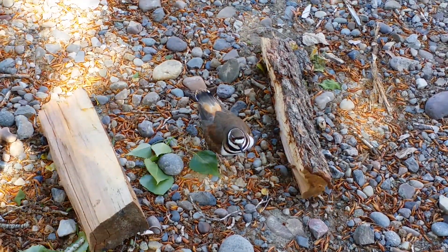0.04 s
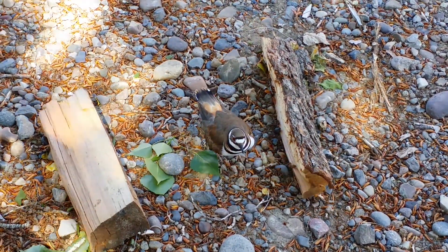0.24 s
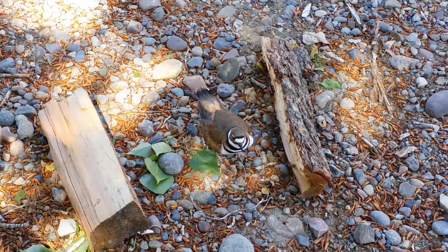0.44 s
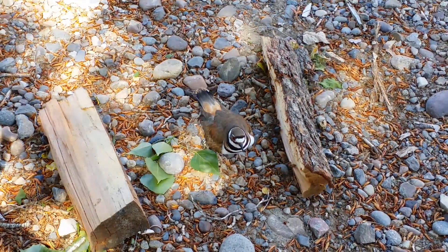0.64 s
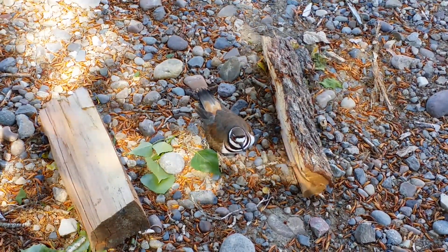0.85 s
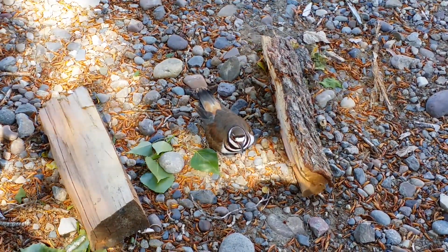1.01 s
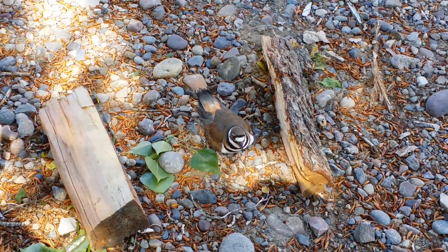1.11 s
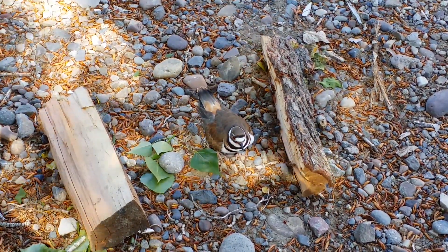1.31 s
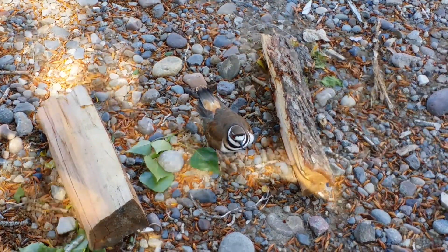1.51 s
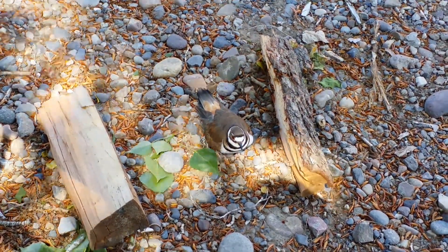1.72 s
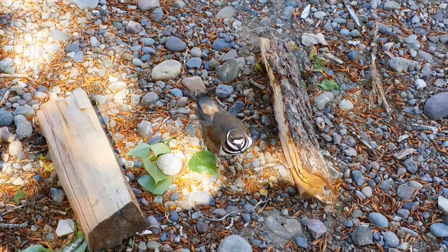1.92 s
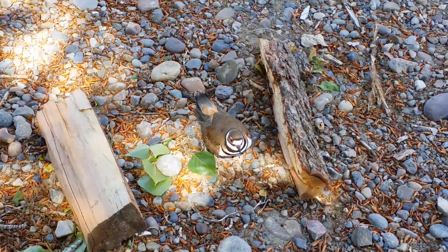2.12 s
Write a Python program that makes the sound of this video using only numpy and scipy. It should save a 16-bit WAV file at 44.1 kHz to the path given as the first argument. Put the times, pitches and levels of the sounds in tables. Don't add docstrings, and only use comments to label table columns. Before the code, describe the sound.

Three evenly spaced, sharp high bird calls, each popping open roughly then breaking to a smoother lower note, close at right on a hand-held stereo microphone; quiet open-air rumble, wind buffets and a faint far hoot.

```python
import sys
import numpy as np
from scipy import signal
from scipy.fft import rfft, irfft, next_fast_len
from scipy.io import wavfile
from scipy.ndimage import uniform_filter1d, map_coordinates

SR = 44100
rng = np.random.default_rng(int(sys.argv[2]) if len(sys.argv) > 2 else 0)


def ratio(d):
    e = np.asarray(d, float) / 20
    return 10 ** e


def dump_mix(stems):
    frames = np.atleast_2d(stems).T
    limited = np.clip(frames, -1, 1)
    pcm = np.round(limited * 32767).astype(np.int16)
    wavfile.write(sys.argv[1], SR, pcm)


N = 94815

# time in seconds, pitch in Hz, level in dB, left minus right in dB.
FIRST_CALL = [
    (.224, 4790, -23, 1),
    (.234, 4927, -13, -11),
    (.247, 4813, -14.5, -11),
    (.254, 4770, -29.5, 3),
    (.261, 4380, -12, -21),
    (.274, 4283, -17.5, -27),
    (.346, 4462, -10, -39),
    (.357, 4596, -20, -15),
    (.366, 4505, -19, -14),
]
SECOND_CALL = [
    (.978, 4760, -24.5, -13),
    (.99, 4920, -14, -8),
    (1.001, 4790, -21.5, -7),
    (1.007, 4700, -25.5, -21),
    (1.013, 4600, -18, -19),
    (1.02, 4446, -13.5, -16),
    (1.043, 4406, -13.5, -37),
    (1.062, 4300, -13, -33),
    (1.087, 4362, -12, -12),
]
THIRD_CALL = [
    (1.77, 4820, -21, -12),
    (1.785, 4900, -14, -10),
    (1.798, 4680, -24.5, -32),
    (1.804, 4564, -13.5, -16),
    (1.817, 4394, -13.5, -20),
    (1.84, 4393, -13, -17),
    (1.86, 4278, -13.5, -21),
    (1.881, 4363, -13, -10),
]


def unit(x):
    return x / np.sqrt(np.mean(x ** 2) + 1e-20)


def along(points, hz):
    f, v = np.transpose(points)
    return np.interp(np.log(hz + 1), np.log(f + 1), v)


def curves(rows):
    s, *cols = np.transpose(rows)
    t = np.arange(N) / SR
    return [uniform_filter1d(np.interp(t, s, c), size=151) for c in cols]


def gate(rows):
    open_s, release_s = .0012, .012
    t = np.arange(N) / SR
    opening = np.clip((t - rows[0][0]) / open_s, 0, 1)
    closing = np.clip(1 - (t - rows[-1][0]) / release_s, 0, 1) ** 2.2
    return opening * closing


def wobble(rate):
    knots = rng.standard_normal(int(N * rate / SR) + 4)
    return map_coordinates(knots, [np.arange(N) * rate / SR])


def filtered(x, response):
    m = next_fast_len(N + 8192)
    return irfft(rfft(x, m) * response(np.fft.rfftfreq(m, 1 / SR)), m)[..., :N]


def rush(spectrum, patchy_db):
    # frequency in Hz, left-right likeness from 0 to 1.
    alike = [(60, 0.62), (250, 0.91), (640, 0.8), (1400, 0.13), (3000, 0.04), (8000, .05)]
    # frequency in Hz, left minus right in dB.
    lean = [(60, -6), (200, -2.5), (640, -3), (1400, 2.5), (4000, -0.5), (8000, -7.5), (10200, -8),
            (11000, -39)]
    left_lead_s = .00014

    z = signal.stft(rng.standard_normal((2, N)), nperseg=512)[2]
    patches = uniform_filter1d(rng.standard_normal(z.shape[1:]), size=6, axis=0)
    patches = uniform_filter1d(patches, size=14, axis=1)
    pair = signal.istft(z * ratio(patchy_db * unit(patches)), nperseg=512)[1][:, :N]

    def shared_and_different(hz):
        turn = np.arccos(np.clip(along(alike, hz), -1, 1)) / 2
        return ratio(along(spectrum, hz)) * [np.cos(turn), np.sin(turn)]

    def leaning(hz):
        gain = ratio(np.minimum(0, np.outer([1, -1], along(lean, hz))))
        return gain * np.exp(np.outer([1j, -1j], np.pi * hz * left_lead_s))

    mid, side = filtered(pair, shared_and_different)
    return unit(filtered(np.array([mid + side, mid - side]), leaning))


def air():
    # time in seconds, background level in dB.
    swell = [
        (0.0, -44),
        (0.02, -41.5),
        (0.2, -42.5),
        (0.22, -47.5),
        (1.09, -48.5),
        (1.41, -45.5),
        (1.75, -46),
        (1.77, -48),
        (2.04, -47),
        (2.15, -48.5),
    ]
    # frequency in Hz, strength in dB per Hz.
    rumble_spectrum = [(21, -20), (35, -22), (70, 0), (183, -3.5), (430, -8.5), (941, -9.5), (1190, -9),
                       (1780, -3.5), (2700, -16), (3510, -19.5), (5940, -120)]
    hiss_spectrum = [(1500, -34), (2500, -11.5), (4700, 0.54), (6100, -8), (8100, -4), (10500, -10.5),
                     (14400, -14.5), (15000, -58)]

    level_db, = curves(swell)
    rumble = ratio(5 + 0.23 * wobble(7.33)) * rush(rumble_spectrum, patchy_db=0.74)
    hiss = ratio(2.5 + 0.17 * wobble(5.7)) * rush(hiss_spectrum, patchy_db=1.2)
    return ratio(level_db) * (rumble + hiss)


def gusts():
    # middle of the gust in seconds, length in seconds, level in dB.
    puffs = [(0.08, 0.097, -60), (0.15, 0.045, -29), (0.183, .025, -41), (0.28, 0.055, -34.5),
             (0.621, 0.028, -36.5), (0.672, 0.046, -36.5), (0.873, 0.05, -39.5), (0.913, .03, -41),
             (1.303, 0.0067, -32.5), (1.912, 0.023, -38), (2.009, 0.091, -31), (2.108, .025, -29),
             (2.14, 0.015, -32.5)]
    # frequency in Hz, strength in dB per Hz.
    buffet_spectrum = [(25, -45), (50, -10), (85, 0.7), (140, -11.5), (260, -25.5), (500, -52.5)]
    left_db = -21

    t = np.arange(N) / SR
    swell = sum(ratio(db) * np.exp(-((t - s) / (0.42 * length)) ** 2) for s, length, db in puffs)
    noise = unit(filtered(rng.standard_normal((2, N)), lambda hz: ratio(along(buffet_spectrum, hz))))
    return ratio([[left_db], [0]]) * swell * noise


def breath_noise():
    # frequency in Hz, strength in dB per Hz.
    breath_spectrum = [(4500, -60), (5200, -2), (9500, 0), (12000, -6), (15000, -9)]
    noise = filtered(rng.standard_normal((2, N)), lambda hz: ratio(along(breath_spectrum, hz)))
    return ratio([[-18], [0]]) * noise


def call(rows):
    # multiple of the whistle, dB in the head, dB in the body, dB per 100 Hz of body pitch.
    partials = [
        (.5, -23, -37.5, 4),
        (1.5, -20.5, -44, 9.5),
        (2, -9, -8.5, -6),
        (2.5, -17.5, -36.5, 3),
        (3, -25.5, -36, 2),
    ]
    # multiple of the whistle, level in dB.
    doubled = [
        (1.25, -26),
        (1.75, -21),
        (2.25, -24),
        (2.75, -40),
    ]
    # frequency in Hz, left minus right in dB.
    shadow = [(2200, -4), (6200, -4), (7300, -12), (8700, -22), (10000, -15), (13500, -17)]
    body_hz, head_hz = 4300, 4634
    doubling_hz, doubling_span_hz = 4672, 108
    break_hz, break_span_hz = 4603, 130.5
    chirp_hz, chirp_s = 700, .0013
    pop_db, pop_s = 6, .0012
    waver_hz, break_jitter_hz = 5, 110
    shimmer_db, break_shimmer_db = .15, 1.8
    breath_db, click_db, right_db = -30, -29, 5
    left_late_s = .001066

    hz, level_db, pan_db = curves(rows)
    since = np.maximum(np.arange(N) / SR - rows[0][0], 0)

    head = np.maximum(np.clip((hz - head_hz) / 150 + .5, 0, 1) * (since < .06), since < .01)
    doubling = np.clip((hz - doubling_hz) / doubling_span_hz, 0, 1) * np.clip(since / 0.0088, 0, 1)
    broken = np.exp(-((hz - break_hz) / break_span_hz) ** 2) * (since < .06)

    chirp = chirp_hz * np.exp(-since / chirp_s)
    hz = hz - chirp + (waver_hz + break_jitter_hz * broken) * wobble(400)
    phase = 2 * np.pi * np.cumsum(hz) / SR

    def rough(k):
        return k * (shimmer_db + break_shimmer_db * broken) * wobble(300)

    def sides(left_db):
        return ratio(np.array([left_db, 0 * left_db]))

    voice = sides(pan_db) * ratio(rough(0.86)) * np.sin(phase)
    weak_db = 0.82 * np.minimum(level_db + 20.5, 0)
    for k, head_db, bottom_db, slope_db in partials:
        low_db = bottom_db + slope_db * np.clip(hz - body_hz, 0, 130) / 100
        db = head * head_db + (1 - head) * low_db
        gain = ratio(db + weak_db + rough(k) + 0.9 * k * wobble(50))
        voice += sides(along(shadow, k * hz)) * gain * np.sin(k * phase)
    for k, db in doubled:
        gain = ratio(db + 1.5 * wobble(150)) * doubling
        voice += sides(along(shadow, k * hz)) * gain * np.sin(k * phase)

    breath = ratio(breath_db) * (.02 + head + 2.2 * broken) * breath_noise()
    click = ratio(click_db - 60 * since / 0.0089) * (since > 0) * breath_noise()
    burst_db = pop_db * np.exp(-((since - pop_s) / pop_s) ** 2) * [[0], [1]]
    sung = np.sqrt(2) * ratio(level_db + burst_db) * gate(rows) * (voice + breath)
    both = ratio(right_db) * (sung + click)
    return filtered(both, lambda f: np.exp(-2j * np.pi * np.outer([left_late_s, 0], f)))


def echoes(x):
    near_db, near_t60_s = [-25, -28], .09
    tail_db, tail_t60_s = [-31, -27], .47
    t = np.arange(SR // 2) / SR
    near = rng.standard_normal((2, len(t))) * ratio(-60 * t / near_t60_s) * (t > .002)
    tail = rng.standard_normal((2, len(t))) * ratio(-60 * t / tail_t60_s) * (t > .01)

    def scaled(h, db):
        return ratio(db)[:, None] * h / np.linalg.norm(h, axis=1, keepdims=True)

    return signal.fftconvolve(x[None], scaled(near, near_db) + scaled(tail, tail_db), axes=1)[:, :N]


def bird():
    # frequency in Hz, echo strength in dB.
    echo_colour = [(2000, 2), (5000, 0), (9000, -5), (14000, -16)]
    total = np.zeros((2, N))
    for rows in (FIRST_CALL, SECOND_CALL, THIRD_CALL):
        direct = call(rows)
        dull = filtered(direct[1], lambda hz: ratio(along(echo_colour, hz)))
        total += direct + echoes(dull)
    return total


def ducking():
    duck_db, back_s = -2.5, .03
    t = np.arange(N) / SR
    depth = np.zeros(N)
    for rows in (FIRST_CALL, SECOND_CALL, THIRD_CALL):
        depth += (t > rows[0][0]) * np.exp(-np.maximum(t - rows[-1][0], 0) / back_s)
    return ratio(duck_db * uniform_filter1d(depth, size=300))


def hoot(rows):
    hz, level_db = curves(rows)
    tone = np.sin(2 * np.pi * np.cumsum(hz + 6 * wobble(59.2)) / SR)
    return np.sqrt(2) * ratio(level_db + 1.9 * wobble(49)) * gate(rows) * tone


def far_bird():
    # time in seconds, pitch in Hz, level in dB.
    low_note = [
        (1.09, 544, -49),
        (1.184, 517, -60),
        (1.2, 527, -54),
    ]
    high_note = [
        (1.38, 925, -55),
        (1.41, 930, -50),
        (1.48, 955, -53),
        (1.5, 960, -56),
    ]
    return hoot(low_note) + ratio([[-3], [3]]) * hoot(high_note)


def scene():
    return bird() + ducking() * (air() + gusts() + far_bird())


def band_limit(x):
    return signal.sosfilt(signal.butter(12, 15900, fs=SR, output="sos"), x)


def record(dry):
    top_hz, slope_hz = 14650, 400
    rolled = filtered(dry, lambda hz: ratio(-12 * np.maximum(hz - top_hz, 0) / slope_hz))
    return band_limit(rolled)


dry = scene()
out = record(dry)
dump_mix(out)
```